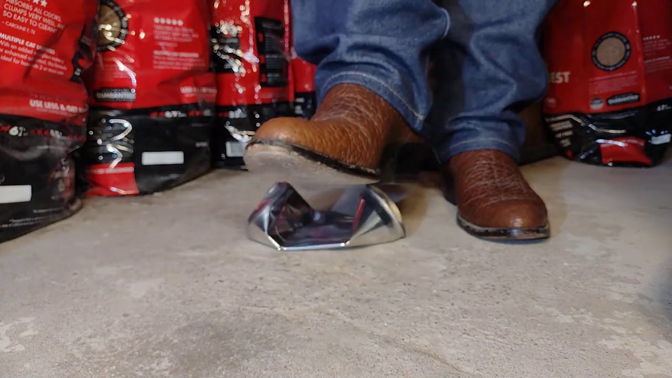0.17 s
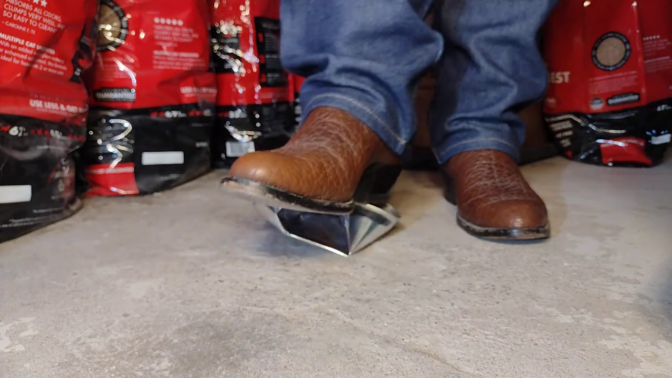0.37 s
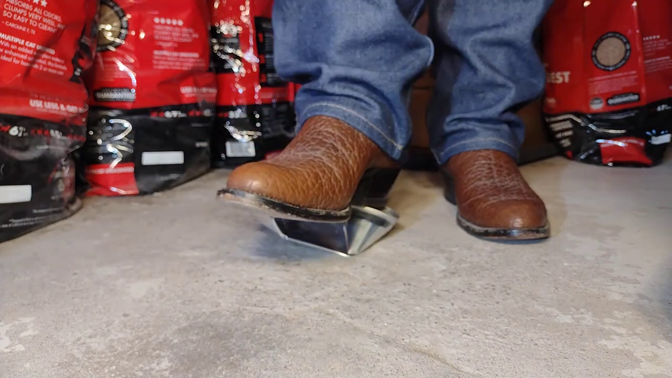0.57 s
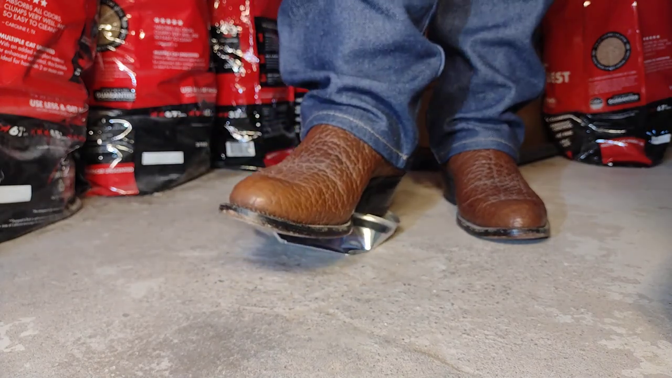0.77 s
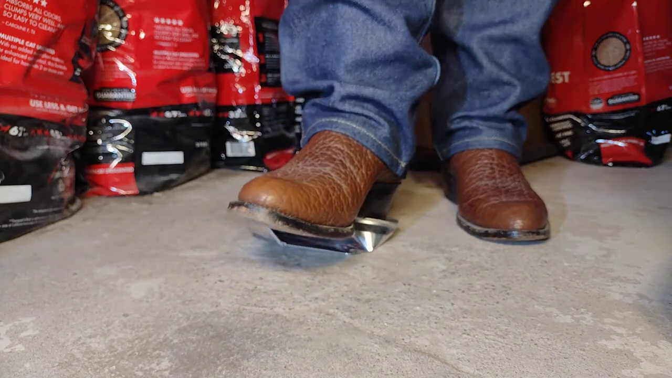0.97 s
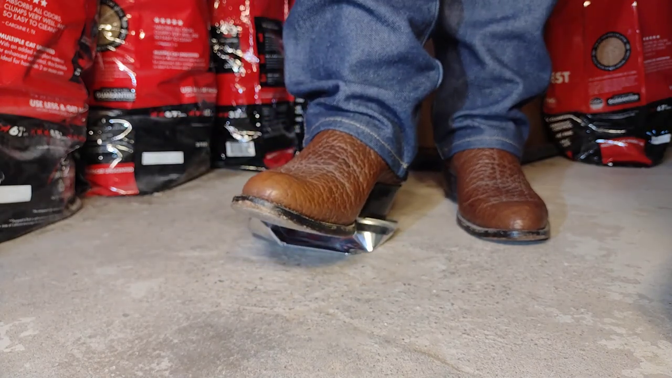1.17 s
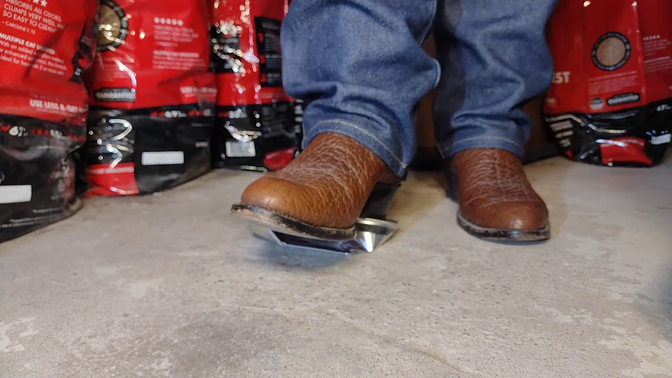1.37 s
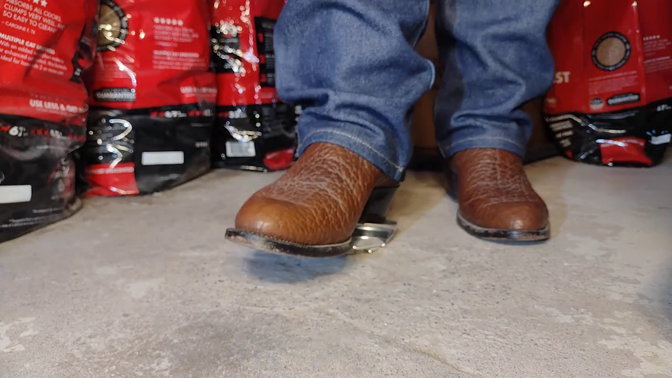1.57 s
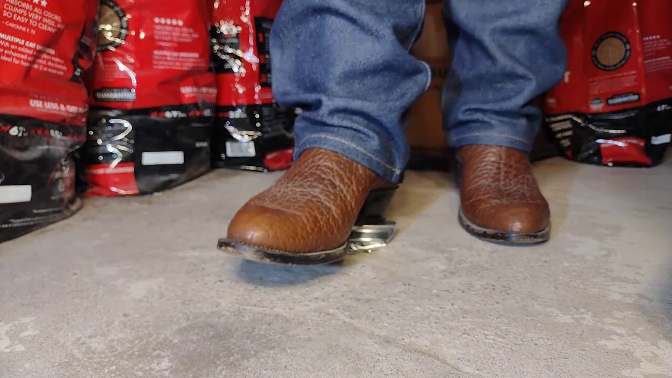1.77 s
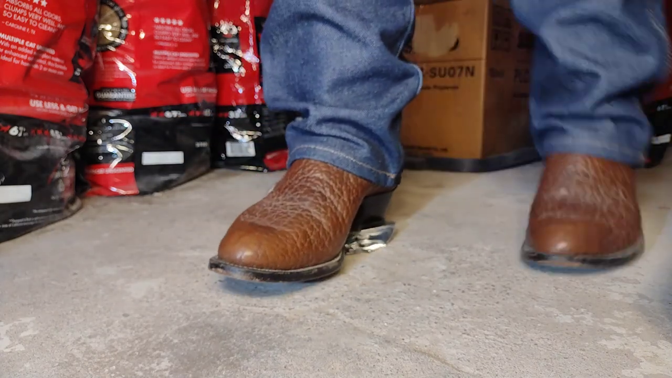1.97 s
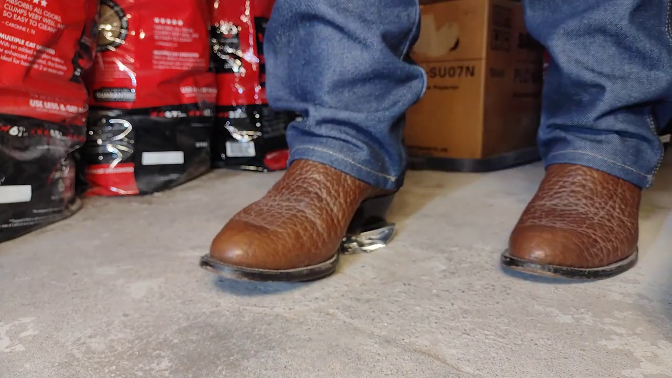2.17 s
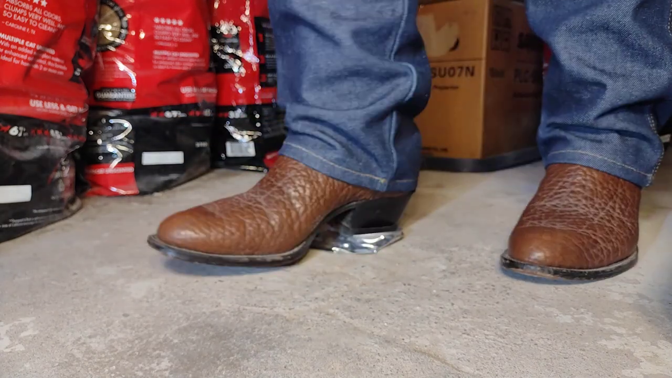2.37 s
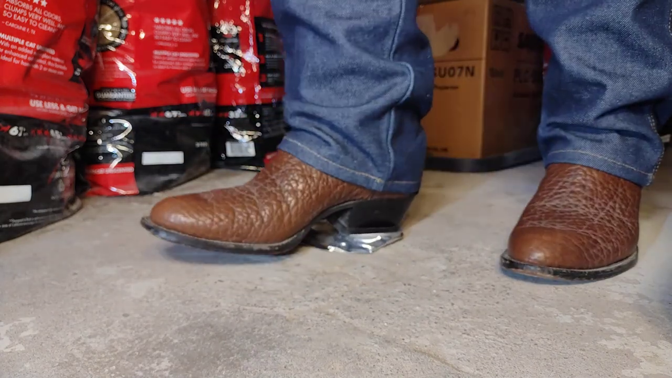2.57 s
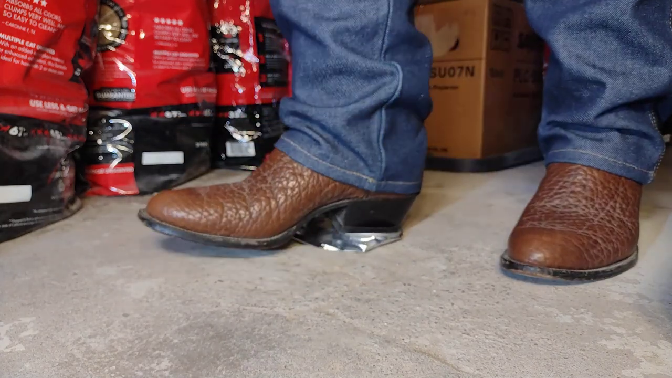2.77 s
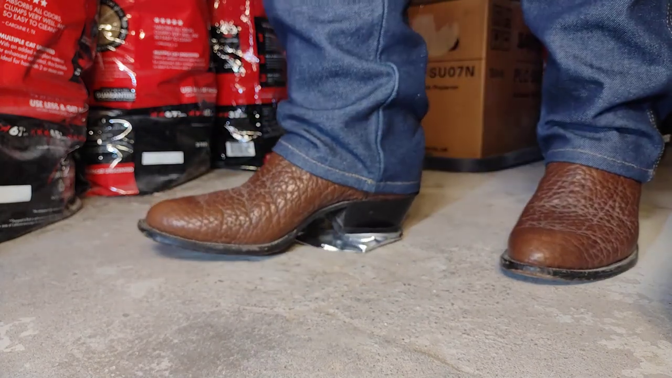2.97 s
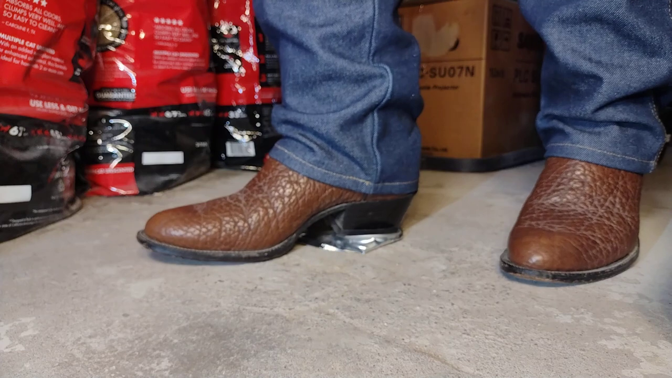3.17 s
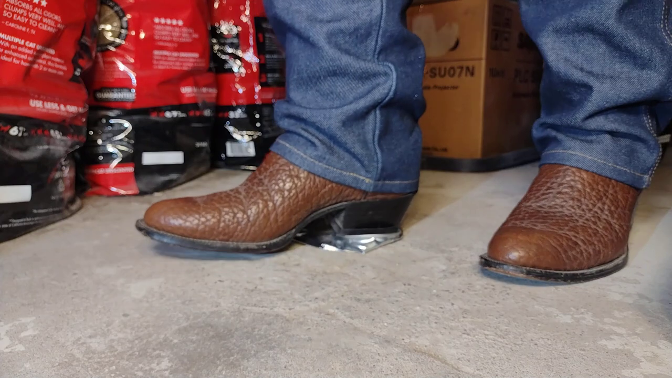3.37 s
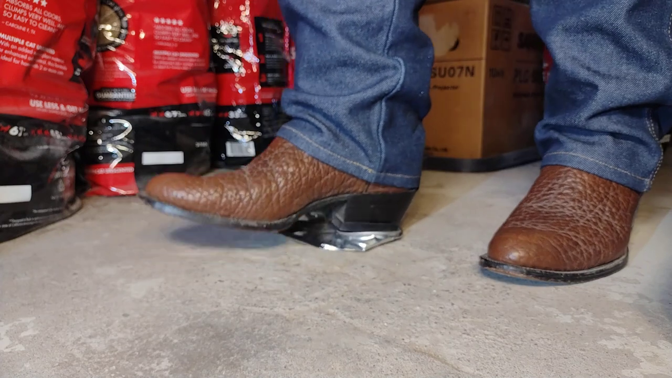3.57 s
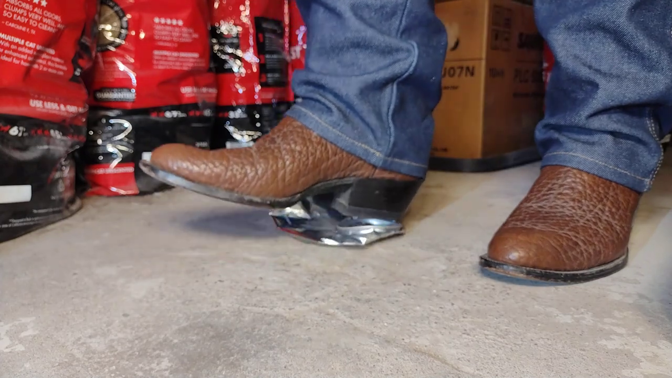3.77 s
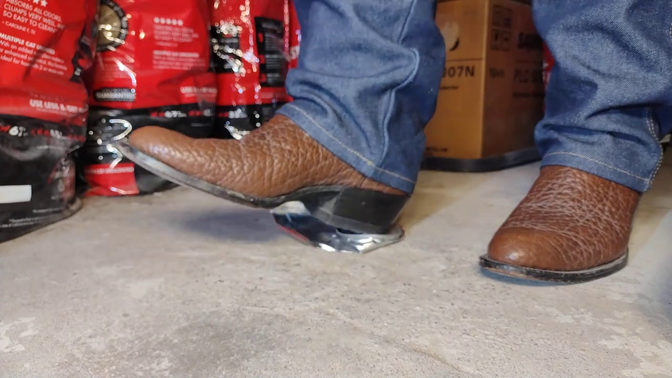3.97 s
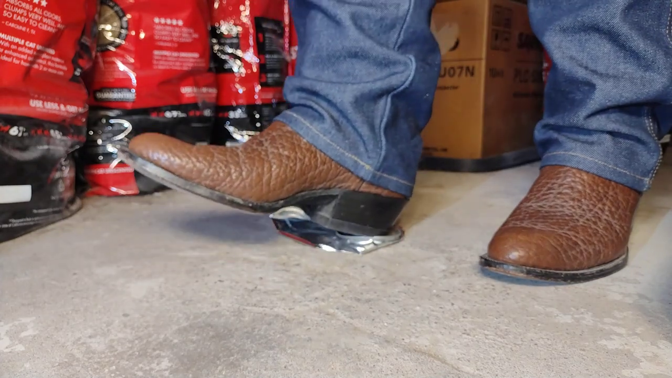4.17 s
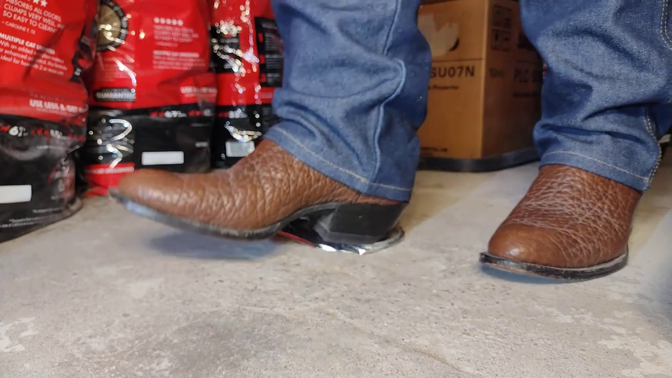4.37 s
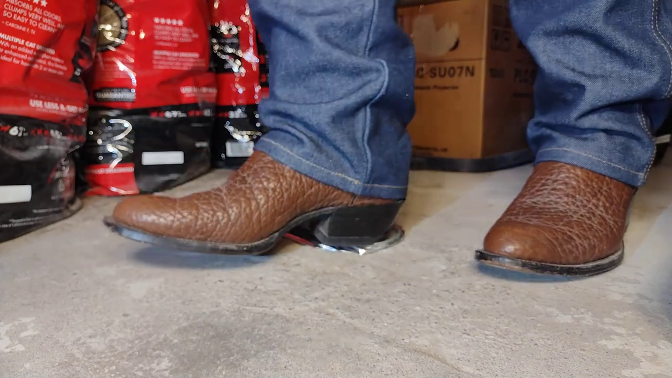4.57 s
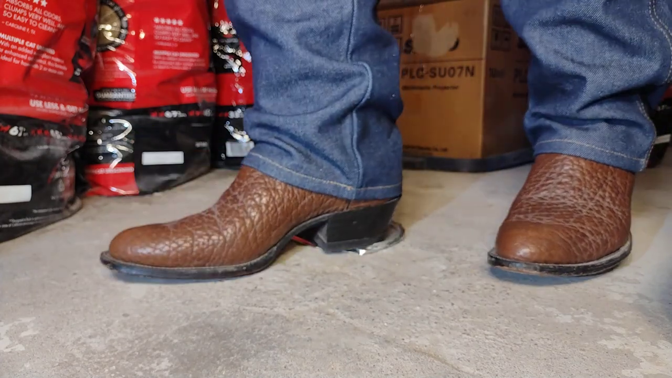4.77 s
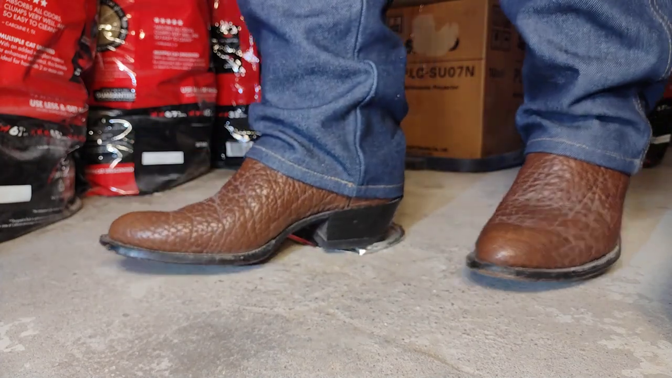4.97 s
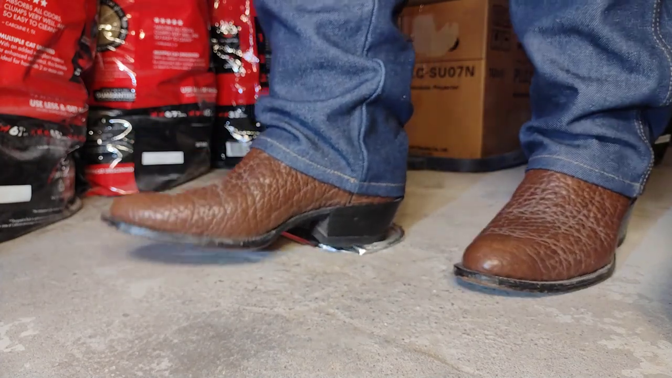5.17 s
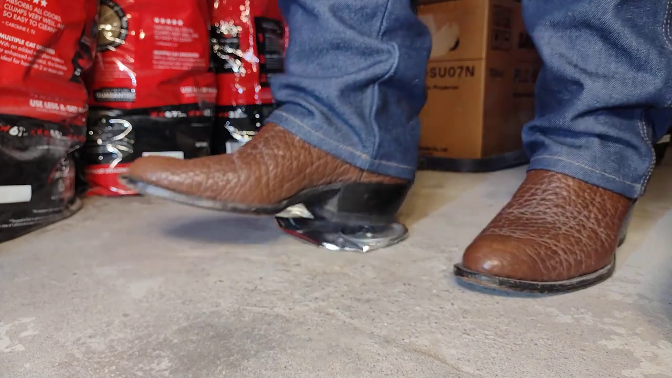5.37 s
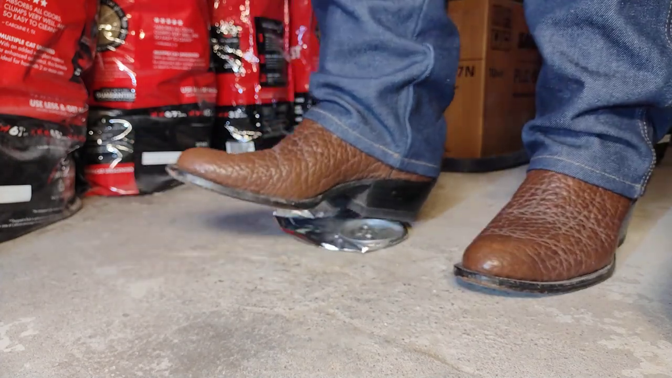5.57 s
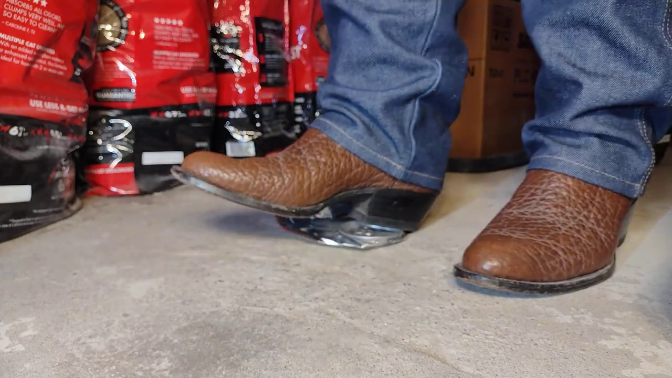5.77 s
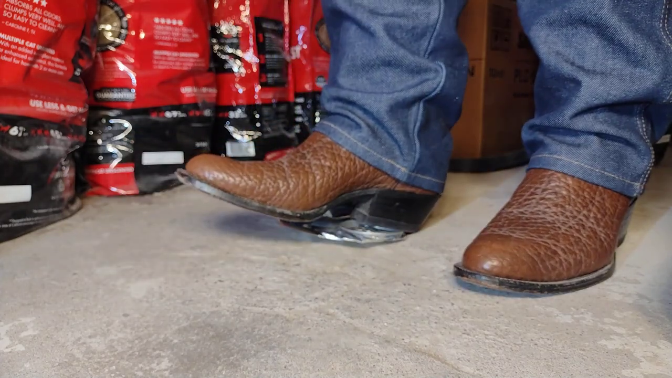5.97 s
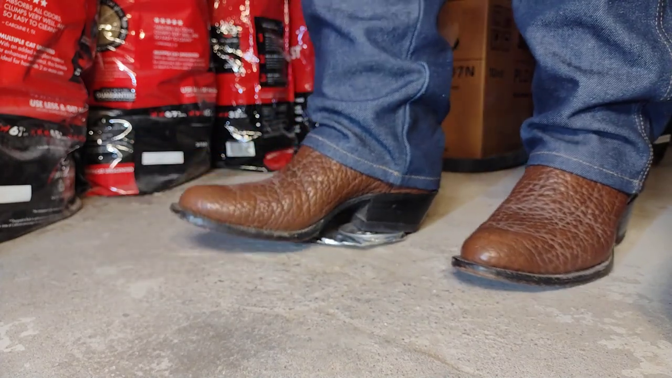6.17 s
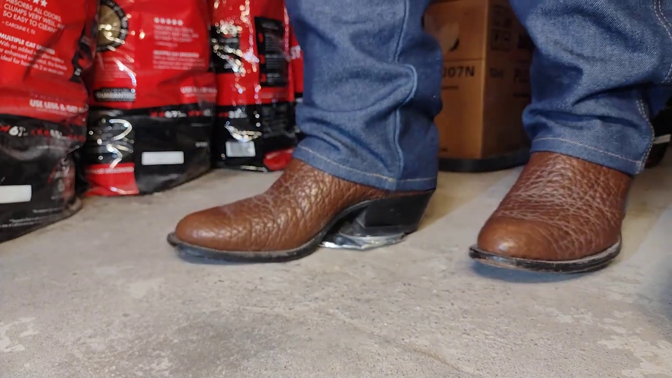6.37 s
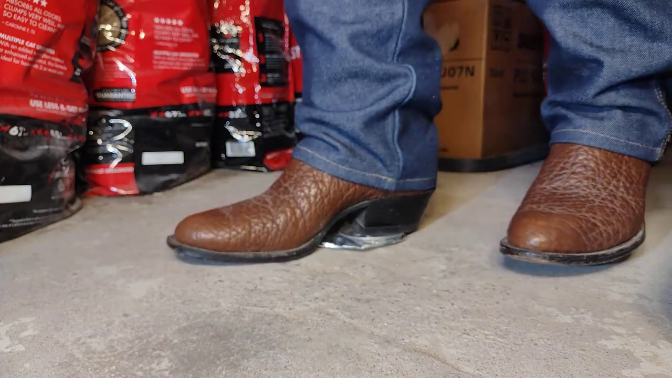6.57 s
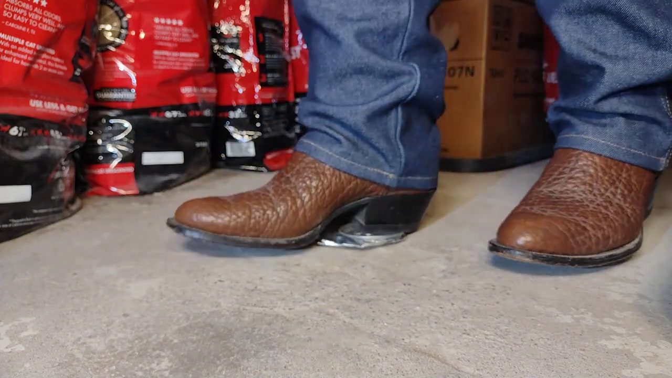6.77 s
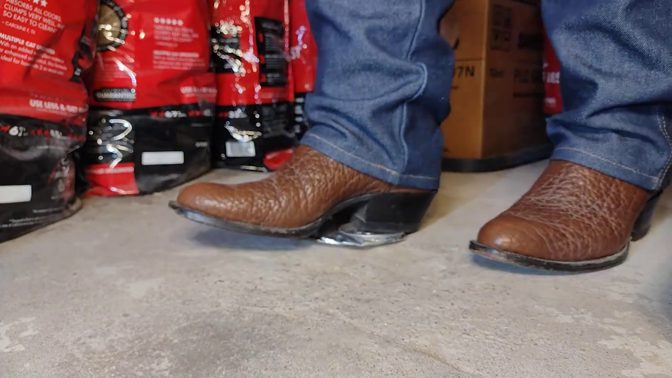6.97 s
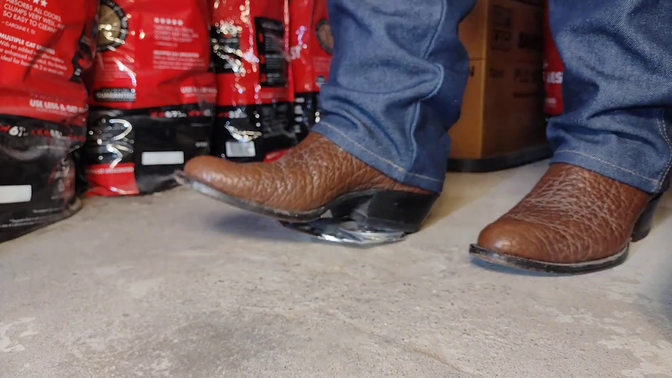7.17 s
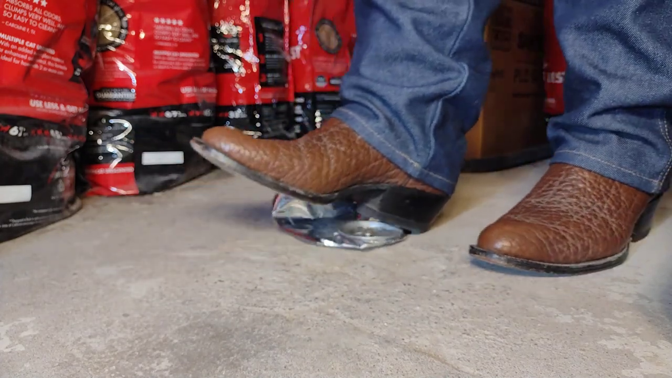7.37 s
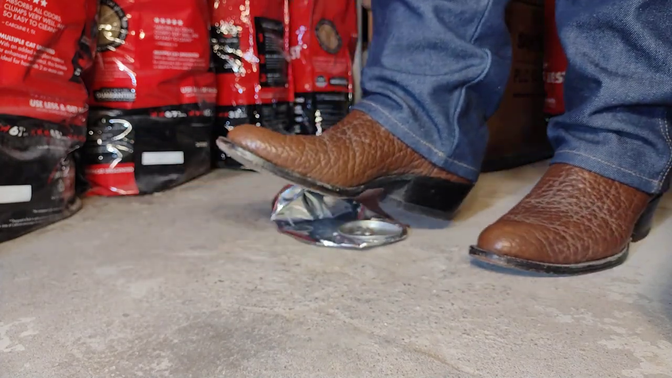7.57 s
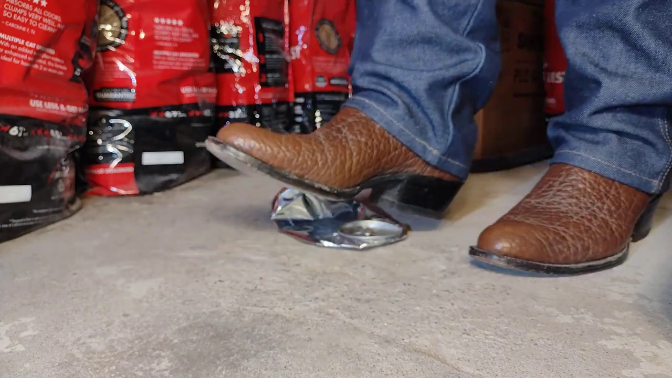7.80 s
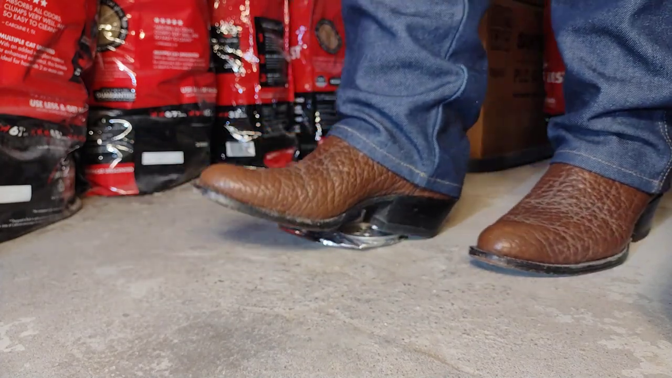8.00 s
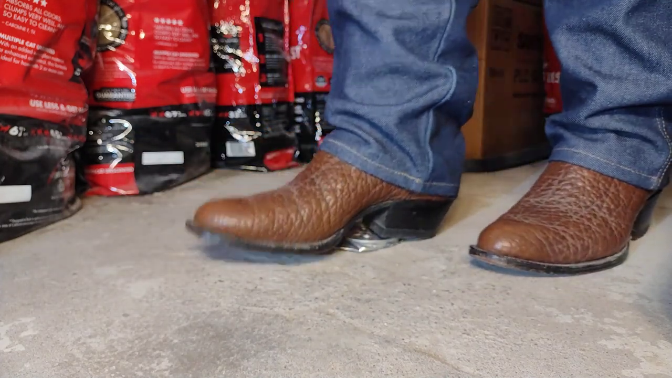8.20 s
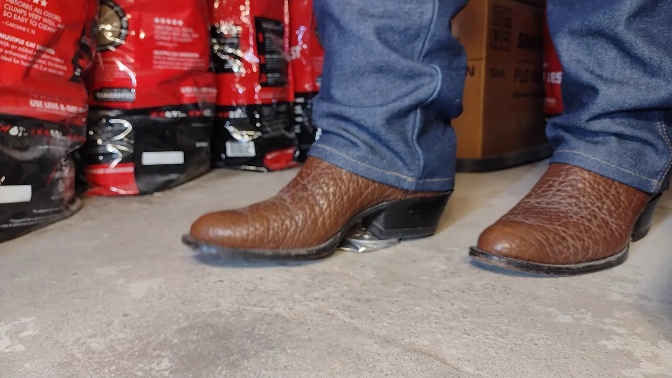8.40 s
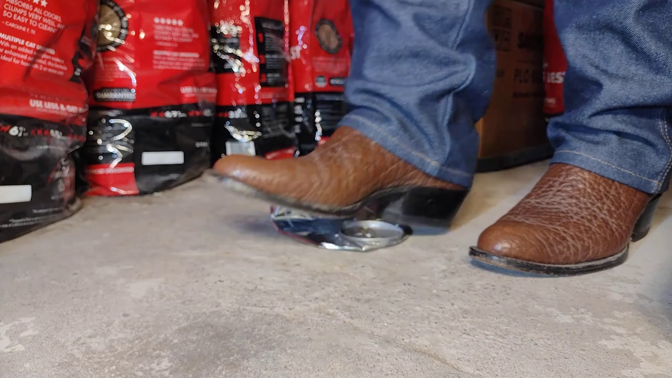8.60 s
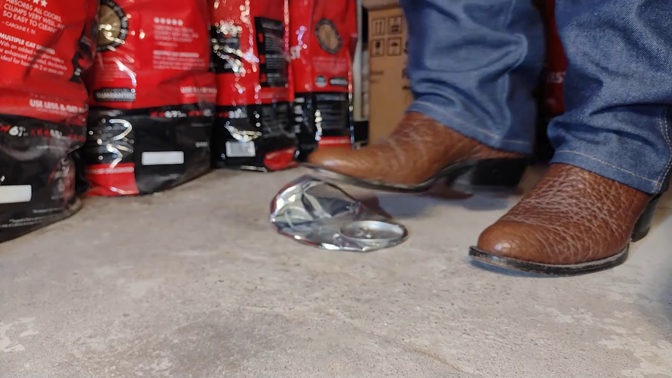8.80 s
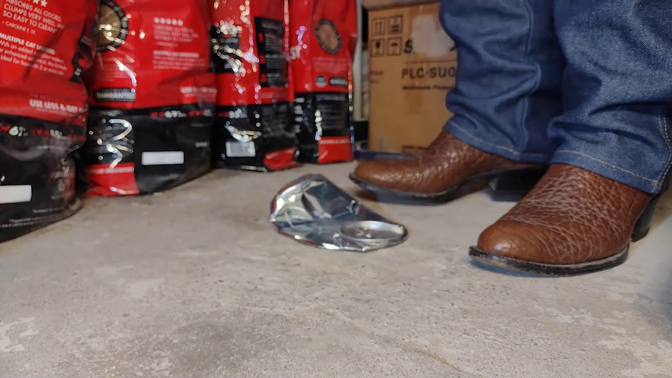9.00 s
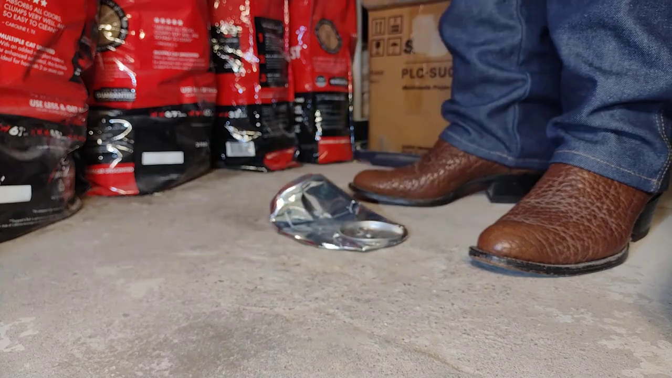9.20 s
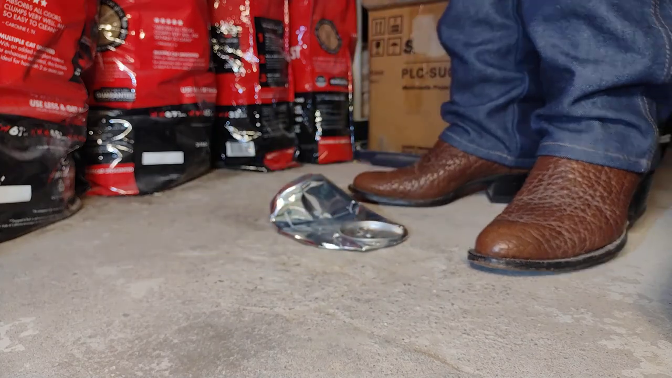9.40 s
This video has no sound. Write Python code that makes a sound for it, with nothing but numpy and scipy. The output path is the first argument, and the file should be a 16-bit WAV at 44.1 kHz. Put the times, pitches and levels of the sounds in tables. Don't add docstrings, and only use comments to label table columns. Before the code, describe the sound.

Heard close in a small, quiet room with a short reverberant tail: a thin metal can crushed under a boot heel on concrete. After a faint start, loud snaps, hollow pops and bright clinks crowd together from 0.25 to 1.0 s. A near pause holds until about 1.5 s, then crackling folds run from 1.55 to 3.2 s, with gritty grinding strongest around 2.4-2.8 s. A heavy crunch at 3.75 s leads to crisp ticks near 4.1 s and flat rim slaps around 4.5 s. Quiet follows, then sharp crackles at 5.1-5.4 s, a tinny pop at 5.75 s and dense crumpling from 6.05 to 7.5 s. After a lull, a hard stamp crunches at 8.0 s, with more snaps at 8.35-8.6 s and a last loud pop at 8.73 s. Faint air remains, with a soft low boot thump at 9.15 s.

```python
import sys
import numpy as np
from scipy import signal
from scipy.fft import rfft, irfft, next_fast_len
from scipy.io import wavfile
from scipy.ndimage import uniform_filter1d

SR = 44100
rng = np.random.default_rng(int(sys.argv[2]) if len(sys.argv) > 2 else 0)


def store_pcm(level_fs):
    pcm = np.round(np.clip(level_fs, -1, 1) * 32767).astype(np.int16)
    wavfile.write(sys.argv[1], SR, np.atleast_2d(pcm).T)


def amplitude_ratio(level_db):
    exponent = np.asarray(level_db, float) / 20
    return 10 ** exponent


N = 416304

# (frequency [Hz], density [dB per Hz])
DENT_SPECTRUM = [(76, -61), (130, -35.5), (210, -17.5), (332, -8), (430, -7), (532, -0.5), (787, -16),
                 (1000, -5), (1300, -19), (2200, -120)]
# (frequency [Hz], density [dB per Hz])
CLACK_SPECTRUM = [(470, -34.5), (800, -12.5), (1050, -7.5), (1190, -7), (1520, -3), (1930, -4.5),
                  (2500, -8), (3060, -5), (4000, -13.5), (5200, -24), (8800, -120)]
# (frequency [Hz], density [dB per Hz])
CRACK_SPECTRUM = [(2000, -37), (3400, -7.5), (3640, -9.5), (4430, -5.5), (8500, -12.5), (11000, -44),
                  (18700, -120)]
# (frequency [Hz], density [dB per Hz])
SIZZLE_SPECTRUM = [(5000, -31), (8500, -7), (15100, -12), (16100, -19), (16500, -28)]
# (frequency [Hz], level [dB], t60 [s])
SHELL_MODES = [(283, -4, 0.053), (533, -6, 0.052), (713, 9, 0.26), (1210, -5, 0.13), (1420, -9, 0.11),
               (1910, -2.5, 0.14), (2990, -10, 0.017)]
# (time [s], peak level [dB], frequency [Hz])
WALL_FOLDS = [(0.254, -9, 678), (0.702, -18, 514), (1.004, -19, 728), (2.026, -22, 536), (1.694, -17, 716),
              (1.772, -20.5, 740), (2.216, -12.5, 571), (2.3, -22.5, 671), (2.355, -16, 697),
              (2.938, -27.5, 533), (2.974, -14.5, 567), (3.732, -9, 340), (5.099, -21, 515),
              (5.153, -25, 341), (5.368, -24, 516), (5.402, -11.5, 506.6), (5.742, -8.5, 331),
              (5.968, -23, 510), (6.073, -19, 507), (6.327, -17.5, 556), (6.714, -22, 341),
              (6.89, -11.5, 533), (7.166, -26.5, 557), (7.402, -18.5, 568), (8.002, -8, 542),
              (8.131, -14, 719), (8.35, -10, 575), (8.734, -6.5, 549), (3.39, -29, 428)]
# (time [s], peak level [dB], frequency [Hz])
MORE_WALL_FOLDS = [(0.363, -19, 523), (0.425, -15, 677), (0.755, -21.5, 425), (0.86, -17.5, 537.6),
                   (0.895, -18, 406), (1.481, -47, 706), (1.52, -34, 705), (1.568, -19.5, 716),
                   (1.926, -14, 554), (2.736, -16, 541.5), (3.096, -27, 544), (3.679, -26, 508),
                   (3.811, -14.5, 523), (3.851, -18.5, 560), (4.134, -18.5, 510), (4.463, -31.5, 707),
                   (4.502, -26, 524), (5.864, -22.5, 587), (6.085, -11, 525), (6.122, -26, 535),
                   (6.251, -22, 860), (6.475, -26.5, 524), (6.855, -22, 544), (6.994, -26.5, 522),
                   (7.202, -17, 553), (7.372, -32, 530), (7.439, -18, 540), (7.502, -16, 592), (8.517, -33, 730),
                   (8.566, -20.5, 733), (8.589, -17.5, 712), (8.699, -26.5, 514)]
# (time [s], clack peak level [dB])
GRIT_SPITS = [(3.0756, -31), (4.305, -32), (4.331, -30), (4.3727, -30), (4.383, -27), (4.7155, -27.5)]
# (time [s], clack peak level [dB])
RIM_SLAPS = [(4.4636, -10.5), (4.5043, -14.5), (4.558, -17.5), (5.3243, -12), (.6648, -11)]


def unit(x):
    return x / np.sqrt(np.mean(x ** 2) + 1e-20)


def along(points, hz):
    f, v = np.transpose(points)
    return np.interp(np.log(hz + 1), np.log(f + 1), v)


def spread(hz):
    # (frequency [Hz], correlation [1])
    likeness = [(60, .995), (200, .99), (380, .95), (620, .15), (1250, .75), (2500, .3), (5000, .12),
                (12000, .01)]
    return np.arccos(np.clip(along(likeness, hz), -1, 1)) / 2


def rush(spectrum, patchy_db, shell_db=-60):
    z = signal.stft(rng.standard_normal((2, N + SR)), nperseg=512)[2]
    field = uniform_filter1d(rng.standard_normal(z.shape[1:]), size=5, axis=0)
    field = uniform_filter1d(field, size=5, axis=1)
    pair = signal.istft(z * amplitude_ratio(patchy_db * unit(field)), nperseg=512)[1]
    m = next_fast_len(pair.shape[1])
    hz = np.fft.rfftfreq(m, 1 / SR)
    peaks = 1 + sum(amplitude_ratio(db + shell_db) / (1 + ((hz - c) * t60 / 2.4) ** 2) for c, db, t60 in SHELL_MODES)
    gain = amplitude_ratio(along(spectrum, hz)) * peaks * [np.cos(spread(hz)), np.sin(spread(hz))]
    mid, side = irfft(rfft(pair, m) * gain, m)[:, :N]
    return unit(np.array([mid + side, mid - side]))


def dying(s, db, rise, snap, tail, tail_db):
    t = np.arange(SR // 2) / SR
    shape = (1 - np.exp(-t / rise)) * (amplitude_ratio(-60 * t / snap) + amplitude_ratio(tail_db - 60 * t / tail))
    energy = np.bincount(np.clip((s * SR).astype(int), 0, N - 1), amplitude_ratio(2 * db), N)
    return np.sqrt(abs(signal.fftconvolve(energy, shape ** 2)[:N]))


def add(out, s, hz, db, t60, rise, held=1):
    t = np.arange(int(SR * min(np.max(t60), held + 0.02))) / SR
    waves = np.exp(np.outer(2j * np.pi * hz - np.log(1000) / t60, t))
    gap = spread(hz) * rng.choice([-1, 1], len(hz))
    shape = (1 - np.exp(-t / rise)) * amplitude_ratio(-1500 * np.maximum(t - held, 0))
    pair = (amplitude_ratio(db) * np.exp(1j * np.array([-gap, gap])) @ waves).imag
    out[:, round(s * SR):][:, :len(t)] += pair * shape


def buckles():
    # (time [s], clack peak level [dB])
    tears = [(.317, -4), (.3444, -9), (.4347, -4), (.696, -3), (.923, -13), (1.929, -2), (1.9638, -3.5),
             (1.9944, -6.5), (2.094, -18), (2.2107, -5.5), (2.3554, -4.5), (2.6, -43), (2.6544, -16.5),
             (2.7362, -7), (2.748, -4), (2.9794, -1.5), (3.33, -40.5), (3.3881, -23), (4.1113, -3),
             (4.155, -8.5), (5.3701, -6.5), (5.4117, -2), (6.0815, -3), (7.655, -36.5), (8.238, -36.5)]
    # (time [s], clack peak level [dB])
    creases = [(0.4246, -6), (0.4471, -2), (0.522, -16), (0.607, -14), (1.6951, -3.5), (0.8632, -2.5),
               (1.007, -9.5), (2.108, -1.5), (2.3006, -5.5), (2.4747, -10.5), (2.625, -22), (3.15, -13),
               (3.1984, -12.5), (3.7487, 2), (5.102, -16.5), (5.4007, -2), (6.072, -7.5), (6.1232, -3),
               (6.3257, -5), (6.4783, -1.5), (6.89, -7), (6.9119, -1.5), (8.3568, -3), (8.517, -7)]
    # (time [s], clack peak level [dB])
    caves = [(0.15, -28.5), (0.181, -25.5), (0.2677, 0.5), (.2999, -0.5), (.7314, -6), (0.6492, -7),
             (8.342, -12), (6.2528, -11.5), (0.811, -4), (1.5685, -8), (2.4065, -28), (2.452, -23),
             (3.6818, -19), (3.7365, -1), (3.808, -2), (3.886, -16.5), (5.1518, -25.5), (5.6459, -22.5),
             (6.2302, -13), (6.314, 0.5), (6.6475, -9.5), (6.7773, -3), (6.994, -10.5), (7.0886, -22),
             (7.249, -9), (7.3676, -14.5), (7.4058, -10), (7.4605, -18), (7.9962, -8), (8.0115, 3)]
    # (time [s], clack peak level [dB])
    pops = [(4.0907, -8.5), (5.741, -1.5), (.897, -3), (1.556, -17), (6.063, -14.5), (7.5015, -10.5),
            (0.254, -8), (.386, -2.5), (.622, -1), (1.5172, -23), (1.777, -4.5), (1.8956, -12),
            (2.434, -21.5), (2.6941, -13), (2.8395, -12.5), (2.9377, -34), (3.1287, -27), (3.1624, -17.5),
            (3.584, -19), (3.6079, -19), (4.2233, -16.5), (5.586, -19.5), (5.7319, -13.5), (5.7992, -8),
            (5.8111, -10.5), (6.1846, -15.5), (6.2939, -17.5), (6.4144, -13), (6.7159, -10.5),
            (6.8521, -2.5), (7.1904, -7.5), (7.3392, -11), (7.5725, -21.5), (8.133, -12), (8.5652, -1),
            (8.7322, 3.5)]
    # (time [s], clack peak level [dB])
    settling = [(.0932, -49), (0.107, -33.5), (0.5811, -20.5), (1.915, -10), (2.026, -16.5), (7.7, -44.5),
                (1.4831, -37.5), (3.0885, -24), (4.074, -23), (5.9607, -36.5), (7.7652, -26), (8.8091, -31),
                (9.331, -41.5)]
    sharpness = [-2.5, -7, -13.5, -20.5, 11, -7, 3.5]
    kinds = [tears, creases, caves, pops, GRIT_SPITS, settling, RIM_SLAPS]
    return [(s, db, db + sharp_db) for kind, sharp_db in zip(kinds, sharpness) for s, db in kind]


def crumble():
    when, size = rng.random((2, 3200))
    size_db = -5 * np.log(size + .03)
    flicker = dying(when * N / SR, size_db, rise=.0003, snap=.006, tail=.05, tail_db=-9)
    return unit(2.1 + unit(flicker))


def snaps():
    s, clack_db, crack_db = np.transpose(buckles())
    sharp_db = np.clip(crack_db - clack_db, -25, 14)
    clack_db, crack_db = clack_db - 9.5, crack_db - 5
    clack = dying(s, clack_db, rise=.0015, snap=.03, tail=.155, tail_db=-5)
    clack = clack * rush(CLACK_SPECTRUM, patchy_db=3, shell_db=.5)
    crack = dying(s, crack_db, rise=.0006, snap=.03, tail=.16, tail_db=-4)
    crack = crack * rush(CRACK_SPECTRUM, patchy_db=2.5)
    sizzle_db = crack_db + .42 * sharp_db
    sizzle = dying(s, sizzle_db, rise=0.0021, snap=0.032, tail=0.25, tail_db=-12)
    sizzle = sizzle * rush(SIZZLE_SPECTRUM, patchy_db=2.0)
    s, db, _ = np.transpose(WALL_FOLDS + MORE_WALL_FOLDS)
    dent = dying(s, db - 12, rise=0.002, snap=0.08, tail=0.22, tail_db=-5)
    dent = dent * rush(DENT_SPECTRUM, patchy_db=-0.5, shell_db=9)
    return dent + crumble() * (clack + crack + sizzle)


def panels():
    # (time [s], peak level [dB], frequency [Hz])
    clinks = [(0.624, 2, 3046), (0.863, -4, 1865), (1.0045, -5, 1994), (1.570, -6, 1420),
              (1.892, -12.5, 1210), (2.106, -2.5, 3213), (2.211, -14, 1096), (2.976, -7.5, 1204),
              (3.128, -7.5, 1210), (3.585, -13, 1210), (3.735, -12.5, 1317), (4.464, -16, 2640),
              (4.504, -17, 3090), (4.718, -21, 1910), (5.101, -17.5, 3130), (5.326, -23.5, 1995),
              (5.399, -16, 2000), (5.739, -3.5, 1210), (6.072, -14.5, 1250), (6.313, -4, 2810),
              (6.479, -3, 2990), (6.651, -14.5, 1575), (6.717, -8.5, 1250), (6.777, -8.5, 1497),
              (6.852, -9.5, 1630), (7.998, -16.5, 1367), (8.348, -7.5, 3000), (8.517, -10.5, 1600),
              (8.5635, -7.5, 1452), (8.733, -10, 1993)]
    # (time [s], level [dB], frequency [Hz], length [s])
    singing = [(4.185, -25, 310, .035), (5.755, -11.5, 1145, .025), (5.808, -9, 1211, .105),
               (6.72, -17.5, 915, .06), (7.19, -23, 275, .04), (7.345, -37.5, 262, .12),
               (7.465, -26.5, 247.6, 0.19), (8.04, -23, 459, .07), (8.136, -26, 461, .12),
               (8.14, -32, 335, .11), (8.76, -31, 1114, .17), (1.79, -22, 1182, .08),
               (1.93, -24.5, 521, .06), (2.66, -24, 1188, .14), (8.135, -26.5, 1243, .05),
               (6.085, -20, 519, .09), (5.8, -15.5, 576, .09), (5.78, -23, 336, .06),
               (6.085, -24, 345.3, .12), (6.25, -22, 871, .04), (8.66, -39, 550, .06), ]
    out = np.zeros((2, N + SR))
    shell_hz, shell_db, shell_t60 = np.transpose(SHELL_MODES[3:])
    for s, clack_db, crack_db in buckles():
        chance = rng.standard_normal((4, 4))
        hz = np.r_[shell_hz * (1 + .015 * chance[0]), 2800 * np.exp(.45 * chance[1])]
        lean_db = [clack_db, clack_db - 8.0, clack_db, crack_db]
        lean = np.interp(np.log(hz), np.log([1660, 2240, 3000, 6100]), lean_db)
        level = np.r_[shell_db - 17 + 4 * chance[2], -17 + 4 * chance[3]]
        add(out, s, hz, lean + level, np.r_[shell_t60, np.full(4, .04)], rise=0.0021)
        add(out, s, hz[-1:], lean[-1] - 3, .007, rise=0.00018)
    for s, db, hz in clinks:
        t60 = 90 / hz * np.array([1, .6])
        add(out, s, hz * np.array([1, 1.11]), db + np.array([-4, -10]), t60, rise=0.00037)
    for s, db, hz in WALL_FOLDS + MORE_WALL_FOLDS:
        add(out, s, hz * np.array([1, 1.3]), db + np.array([-5, -13]), np.array([.11, .08]), rise=0.001)
    for s, db, hz, length in singing:
        pair_hz = hz * np.array([1, 1.012])
        add(out, s, pair_hz, db + np.array([0, -9]), 1.9 * length, rise=.004, held=length)
    return out[:, :N]


def pressure():
    # (full weight from [s], held [s], grinding clack [dB], grit [dB], groan [dB])
    heel_strokes = [(0, 0.00088, -35.5, -60.5, -35), (0.199, 0.093, -34, -57.5, -31),
                    (.36, .15, -26, -29, -32), (0.741, 0.21, -26.5, -34.5, -34.5),
                    (1.62, 0.16, -42.5, -58.5, -53), (1.85, 0.28, -42, -46.5, -39.5),
                    (2.378, 0.1, -25.5, -26.5, -34), (2.682, 0.077, -26.5, -27, -35.5),
                    (3.12, 0.009, -36.5, -42.5, -39), (3.417, 0.0042, -47, -46, -49),
                    (3.74, 0.18, -34, -54, -38), (3.88, 0.21, -32.5, -46, -36),
                    (4.17, 0.049, -26.5, -45, -31.5), (4.28, 0.09, -44.5, -42, -59),
                    (4.649, .2, -63.5, -53, -70), (5.5, 0.16, -37, -55.5, -39),
                    (5.782, 0.02, -26, -48, -23), (6.2, 0.055, -35.5, -43.5, -38.5),
                    (6.35, 0.11, -40, -63, -45.5), (6.93, 0.039, -42, -43, -39),
                    (7.2, 0.081, -43, -55, -47.5), (7.499, 0.036, -29, -48.5, -31.5),
                    (8.1, 0.021, -37.5, -39.5, -46), (8.66, 0.15, -34, -45, -37.5)]
    rest_db = [-76, -72.5, -74.5]
    lean_db_per_s, lift_db_per_s = 217, 265.5
    t = np.arange(0, N, 256) / SR
    s, held, *levels = np.transpose(heel_strokes)[:, :, None]
    loss_db = lean_db_per_s * np.maximum(s - t, 0) + lift_db_per_s * np.maximum(t - s - held, 0)
    energies = [amplitude_ratio(2 * (db - loss_db)).sum(0) + amplitude_ratio(2 * rest) for db, rest in zip(levels, rest_db)]
    clack_db, grit_db, groan_db = 10 * np.log10(energies)
    slab_db = -21.5 + .4 * grit_db + .35 * groan_db
    return [np.interp(np.arange(N) / SR, t, v) for v in (clack_db, grit_db, groan_db, slab_db)]


def chips():
    # (time [s], peak level [dB])
    grain_breaks = [(.1765, -38), (0.252, -36), (0.8077, -26.5), (.8475, -29), (.9505, -27.5),
                    (.9985, -36.5), (1.5524, -34.5), (1.7595, -38.5), (2.638, -30.5), (4.0873, -33.5),
                    (4.0991, -23), (5.7333, -32), (5.7462, -27), (5.7854, -31), (6.2302, -25.5),
                    (7.52, -33), (.633, -29), (1.036, -32.5), (1.0505, -27), (1.15, -58.5), (1.397, -56),
                    (1.421, -54), (1.792, -39.5), (1.868, -37), (2.1834, -38.5), (2.2036, -40),
                    (2.3925, -21), (2.4088, -19.5), (2.436, -24.5), (2.6935, -16.5), (2.7209, -16),
                    (2.7821, -20), (3.1406, -32.5), (3.3418, -44), (3.5222, -54), (3.562, -45.5),
                    (3.86, -23), (4.1482, -20.5), (4.2745, -30), (4.3656, -27), (4.666, -39), (5.0398, -55),
                    (5.4985, -39.5), (5.5258, -43), (5.673, -39.5), (5.865, -50.5), (5.887, -47.5),
                    (6.245, -25.5), (6.2787, -19), (7.081, -45.5), (7.174, -42), (7.2043, -36),
                    (7.234, -25), (7.28, -27.5), (7.3346, -34), (7.4859, -33.5), (8.2176, -52),
                    (8.3138, -47.5), (8.7825, -33), (9.0515, -59.5), (9.299, -61)]
    s, db = np.transpose(grain_breaks)
    grains = dying(s, db, rise=0.00034, snap=0.0093, tail=0.16, tail_db=-9)
    s, db = np.transpose(RIM_SLAPS + GRIT_SPITS)
    return grains + dying(s, db + 12.5, rise=.00015, snap=.007, tail=.02, tail_db=-15)


def grinding():
    # (frequency [Hz], density [dB per Hz])
    slab_spectrum = [(40, -31.5), (70, -8.5), (97, -0.5), (125, -7), (165, -6), (230, -11.5), (400, -63)]
    clack_db, grit_db, groan_db, slab_db = pressure()
    when, size = rng.random((2, 2600))
    when, size_db = when * N / SR, -4 * np.log(size + .02)
    fine = unit(dying(when, size_db, rise=0.00063, snap=0.0051, tail=0.39, tail_db=-18.5))
    coarse = unit(dying(when[::4], size_db[::4], rise=0.0015, snap=0.03, tail=0.17, tail_db=-6))
    clack = amplitude_ratio(clack_db - 3.5) * coarse * rush(CLACK_SPECTRUM, patchy_db=1.5, shell_db=4)
    hiss = rush(CRACK_SPECTRUM, patchy_db=0.0) + amplitude_ratio(-1.0) * rush(SIZZLE_SPECTRUM, patchy_db=1.5)
    grit = (amplitude_ratio(grit_db - 1.2) * fine + chips()) * unit(hiss)
    groan = amplitude_ratio(groan_db - 2.5) * coarse * rush(DENT_SPECTRUM, patchy_db=1.5, shell_db=6.0)
    rumble = amplitude_ratio(slab_db - 2.5) * rush(slab_spectrum, patchy_db=1.5)
    return clack + grit + groan + rumble


def crinkle():
    # (frequency [Hz], t60 [s])
    facet_tables = [
        [(1130, .12), (1220, .16), (1440, .12), (1900, .1), (1640, .07)],
        [(330, .1), (440, .12), (540, .16), (720, .16), (930, .1)],
    ]
    over_load_db, size_spread_db = [-1.5, 0], 4.3
    out = np.zeros((2, N))
    for facets, load_db, over_db in zip(facet_tables, pressure()[::2], over_load_db):
        layer = np.zeros((2, N))
        for hz, t60 in facets:
            when, size = rng.random((2, 700))
            ticks = np.bincount((when * N).astype(int), amplitude_ratio(-size_spread_db * np.log(size + 0.042)), N)
            ring = np.zeros((2, SR // 4))
            add(ring, 0, hz * np.array([1, 1.06]), np.array([0, -5]), t60, rise=.4 / hz)
            layer += signal.oaconvolve(ticks[None], unit(ring), axes=1)[:, :N]
        out += amplitude_ratio(load_db + over_db) * unit(layer)
    return out


def contacts():
    # (time [s], peak level [dB], frequency [Hz])
    knocks = [(0.645, -11.5, 364), (1.001, -27, 258), (2.104, -24.5, 269), (2.211, -24.5, 266),
              (3.73, -18, 337), (4.19, -22, 357), (4.499, -33, 345), (6.227, -31, 326), (7.073, -32, 255),
              (7.248, -29, 307), (7.463, -27.5, 253), (8.344, -22, 398), (8.59, -26, 260),
              (8.731, -19, 318)]
    # (time [s], peak level [dB], frequency [Hz])
    clicks = [(0.2663, -3.5, 1880), (0.2995, -8.5, 1640), (0.3445, -12, 1920), (0.386, -7.5, 1984),
              (0.4233, -7, 1670), (0.4464, -6.5, 1184), (0.4638, -10, 2090), (0.6483, -8, 1220),
              (0.6633, -4, 2730), (0.6968, -6.5, 3390), (0.7316, -6.5, 2030), (0.8119, -9.5, 1850),
              (0.8973, -7, 1860), (0.9266, -11.5, 3200), (1.6951, -10, 1420), (1.9639, -9, 1280),
              (1.9943, -14.5, 1850), (2.452, -11, 1330), (2.7471, -7, 1143), (2.8398, -15, 1960),
              (3.1521, -11.5, 1164), (3.1975, -10, 1636), (3.6084, -15, 1160), (3.6819, -16, 1200),
              (3.7743, -13, 1790), (3.8078, -6.5, 1350), (3.886, -13, 1210), (3.9729, -27, 1200),
              (4.0337, -22.5, 1610), (4.09, -10, 1330), (4.11, -7.5, 3100), (4.1364, -9, 3090),
              (4.156, -9, 1760), (4.2218, -15, 1210), (5.8107, -6, 1190), (6.1218, -6.5, 3120),
              (6.1862, -16.5, 1424), (6.2516, -9, 1210), (6.4248, -13.5, 1210), (7.187, -14.5, 1370),
              (7.2038, -15, 1200), (7.2488, -14, 1177), (7.339, -15.5, 1620), (7.4055, -10, 1920),
              (7.5034, -9, 1350), ]
    # (time [s], peak level [dB], frequency [Hz], t60 [s])
    taps = [(.181, -27, 520, .06), (.3, -18.5, 603, 0.091), (.32, -16.5, 452, 0.053),
            (.6225, -7, 3290, 0.065), (1.004, -10.5, 3290, 0.032), (1.9, -23.5, 513, .07),
            (2.84, -29.5, 560, 0.066), (3.16, -27, 800, 0.051), (5.732, -11.5, 1430, .08),
            (5.775, -13, 504, .07), (5.8, -12, 1400, .08), (6.294, -13, 1207, .06), (6.78, -37, 475, 0.16),
            (7.77, -47, 537, 0.08), (8.133, -14, 1420, 0.058), (8.36, -21.5, 419, 0.14),
            (8.005, -24.5, 290, 0.13), (9.15, -43.5, 1200, .05), (9.151, -36.5, 520, .05),
            (9.195, -41, 469, .05)]
    out = np.zeros((2, N + SR))
    for s, db, hz in knocks:
        pair_hz = hz * np.array([1, 1.35])
        add(out, s + .004, pair_hz, db + np.array([.6, -6]), np.array([.045, .03]), rise=0.0011)
    for s, db, hz in clicks:
        t60 = np.array([.045, .02, .014])
        add(out, s, hz * np.array([1, .8, 1.3]), db + np.array([-5, -9, -9]), t60, rise=.0004)
    for s, db, hz, t60 in taps:
        add(out, s, np.array([hz]), db, t60, rise=0.41 / hz)
    return out[:, :N]


def boots():
    # (time [s], peak level [dB], frequency [Hz])
    thumps = [
        (0.639, -29.5, 296),
        (5.15, -27, 267),
        (6.899, -32.5, 258),
        (7.996, -21.5, 285),
        (8.346, -30.5, 241),
        (9.145, -21.5, 247),
        (9.19, -37, 172.6),
    ]
    out = np.zeros((2, N + SR))
    for s, db, hz in thumps:
        t60 = np.array([.03, .1, .05])
        add(out, s + .006, np.array([hz, 97, 165]), db + np.array([-2, -9, -7]), t60, rise=0.0027)
    return out[:, :N]


def still_air():
    # (frequency [Hz], density [dB per Hz])
    air_spectrum = [(15, -58), (25, -21), (92, -1.5), (159, -11.5), (809, -24), (2210, -14.5), (5270, -26),
                    (14800, -36.5), (16500, -38)]
    return amplitude_ratio(-68) * rush(air_spectrum, patchy_db=-1.0)


def scene():
    no_bass = signal.butter(2, 170, "high", fs=SR, output="sos")
    sheet = signal.sosfilt(no_bass, panels() + crinkle() + snaps())
    return sheet + grinding() + boots() + still_air() + contacts()


def low_pass(x):
    return signal.sosfilt(signal.butter(12, 16660, fs=SR, output="sos"), x)


def record(dry):
    thin = signal.sosfilt(signal.butter(2, 62, "high", fs=SR, output="sos"), dry)
    soft = thin / (1 + abs(thin / .97) ** 4) ** (1 / 4)
    cut = signal.sosfiltfilt(signal.butter(12, 16050, fs=SR, output="sos"), soft)
    return low_pass(cut)


dry = scene()
out = record(dry)
store_pcm(out)
```